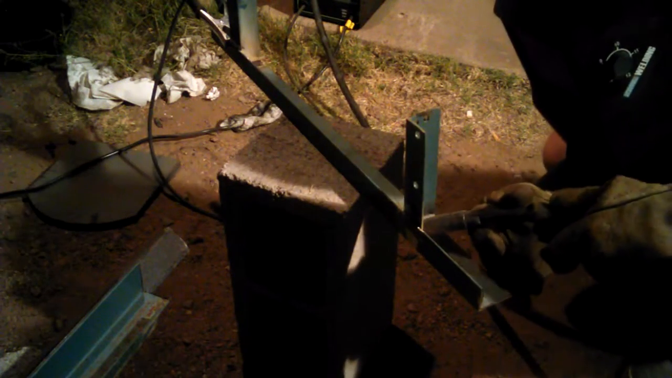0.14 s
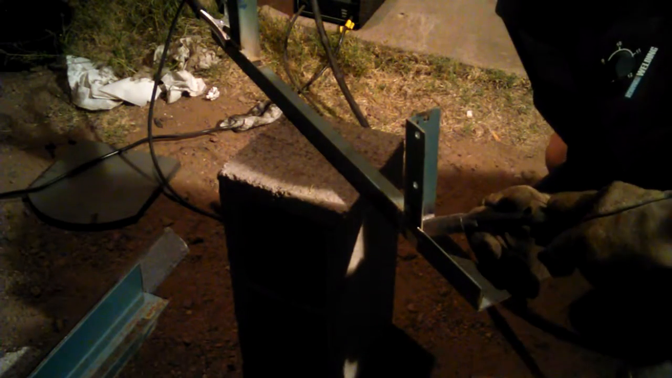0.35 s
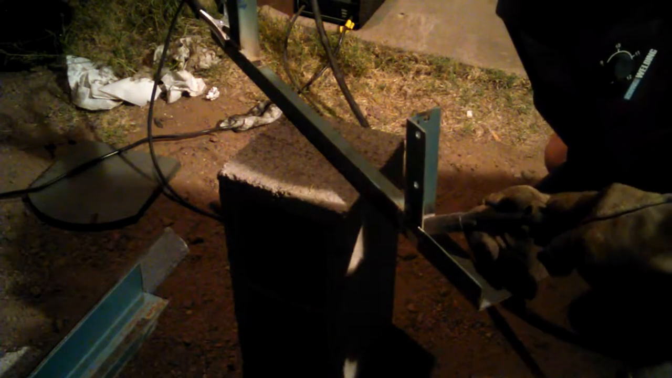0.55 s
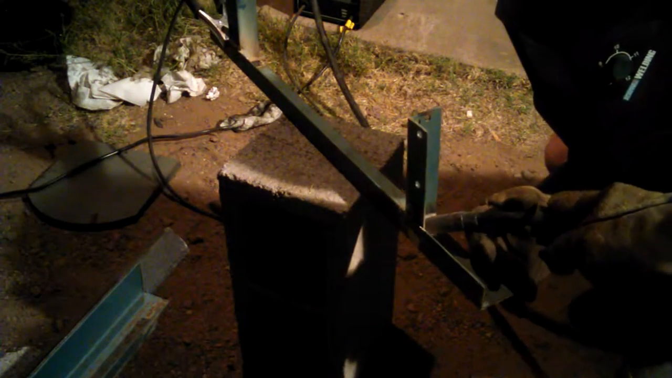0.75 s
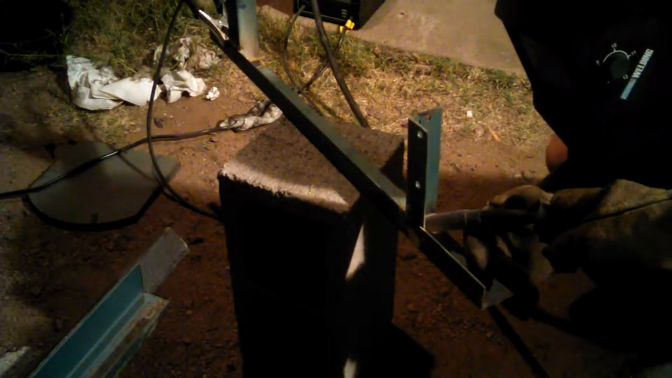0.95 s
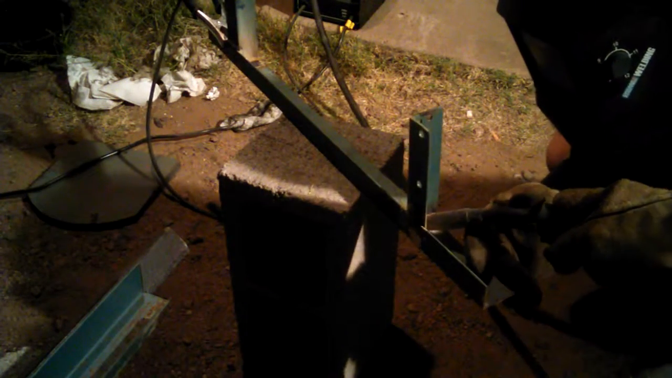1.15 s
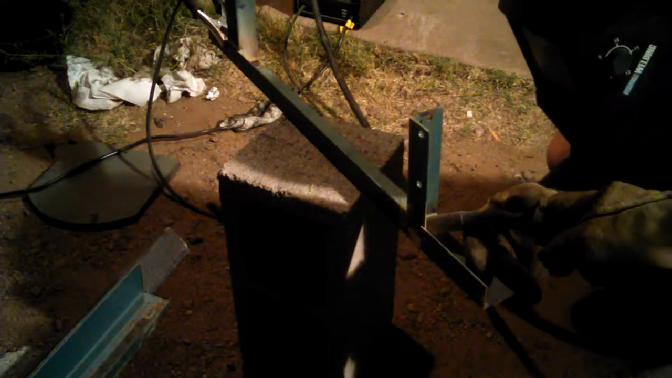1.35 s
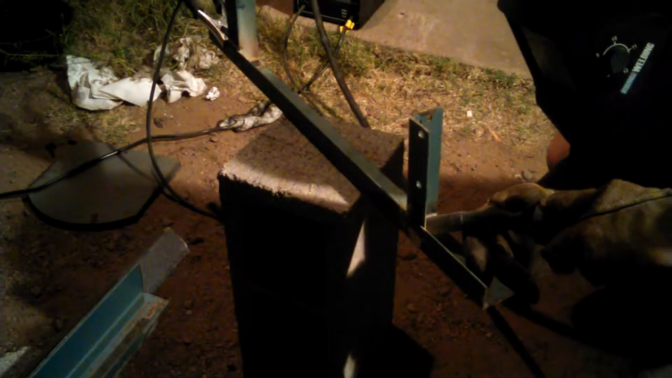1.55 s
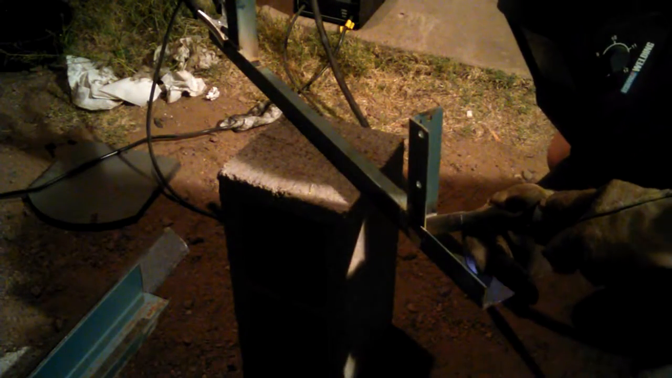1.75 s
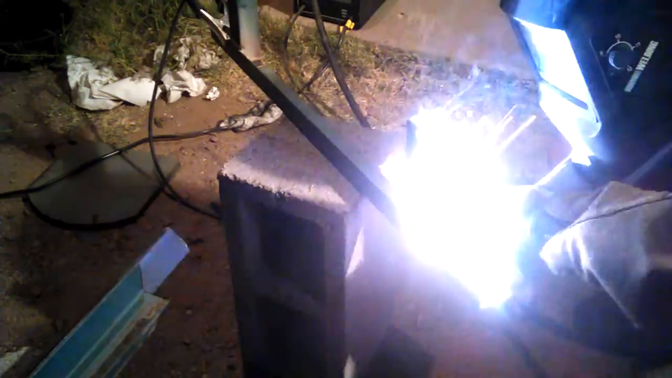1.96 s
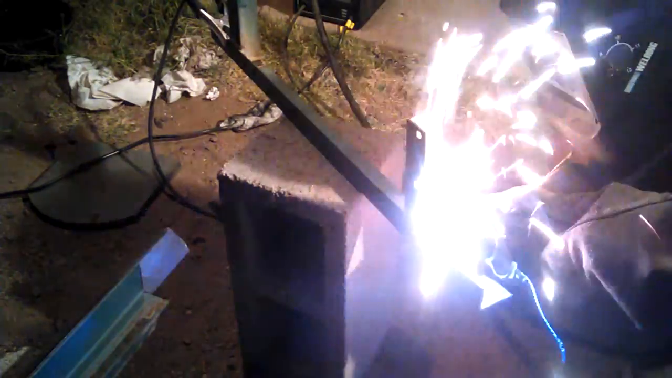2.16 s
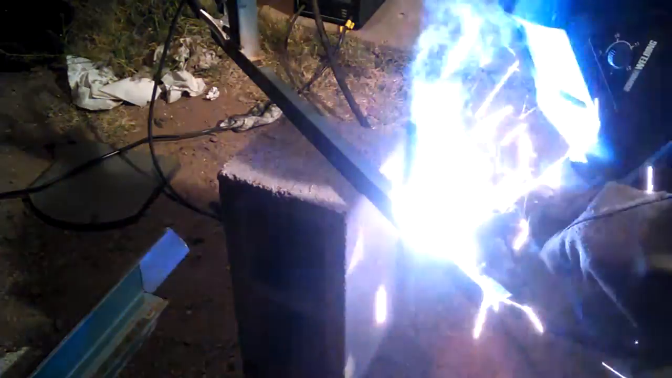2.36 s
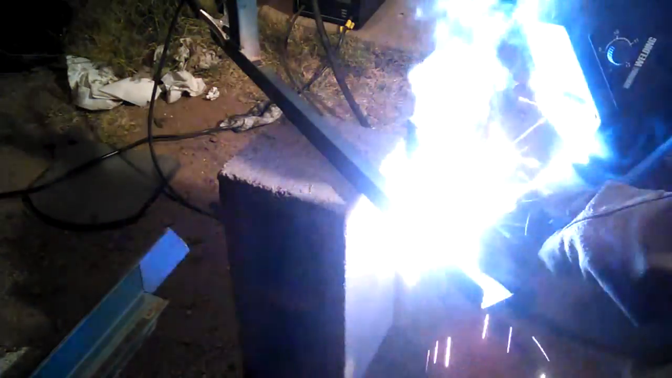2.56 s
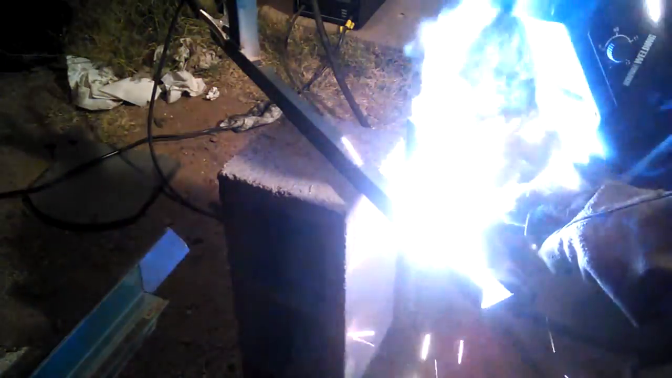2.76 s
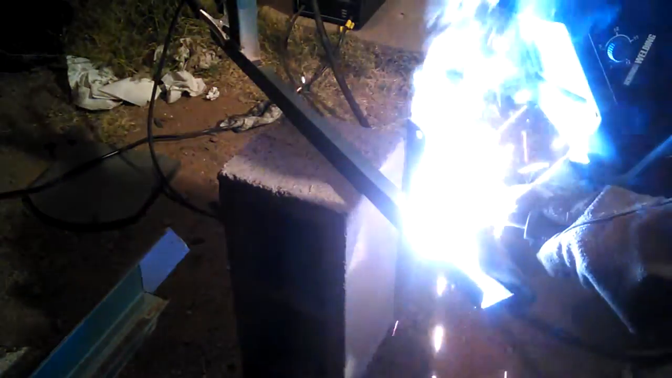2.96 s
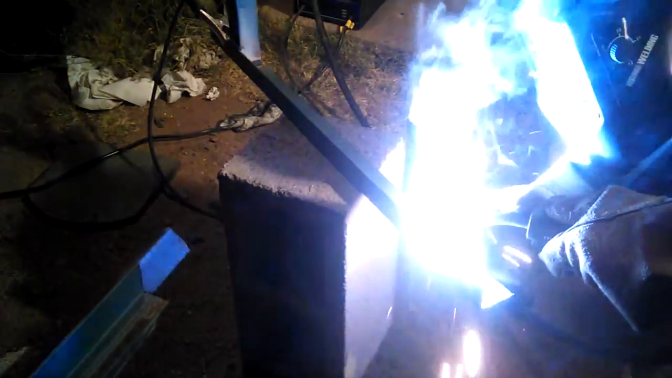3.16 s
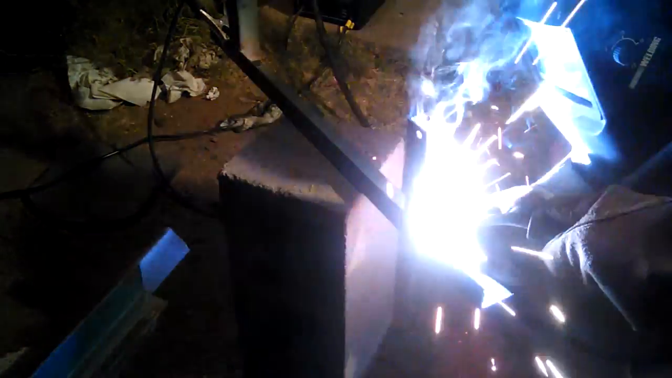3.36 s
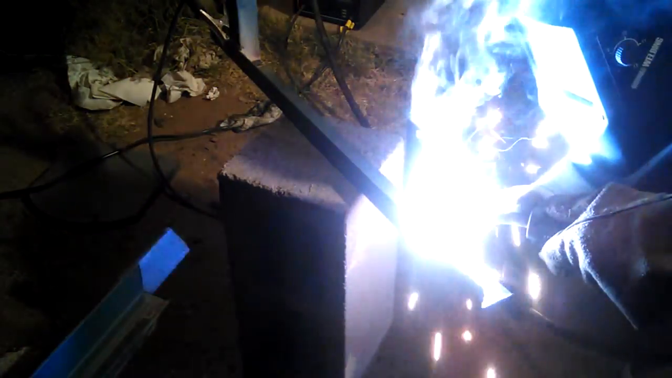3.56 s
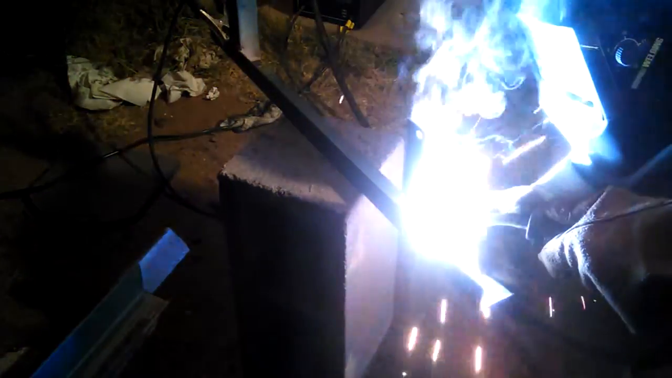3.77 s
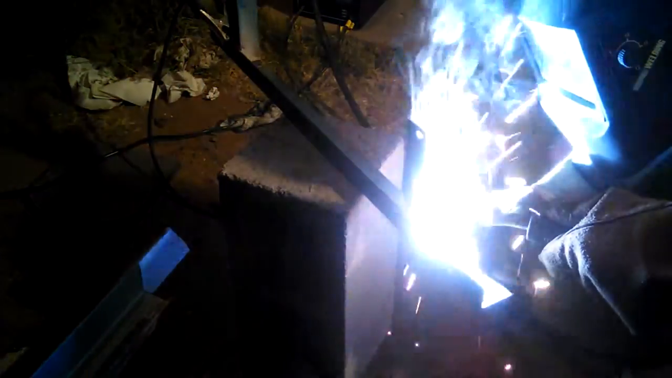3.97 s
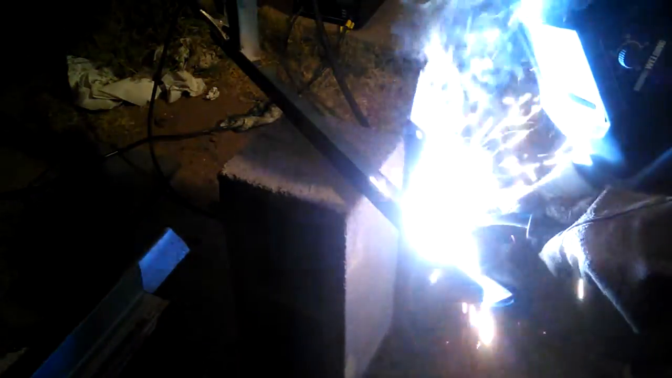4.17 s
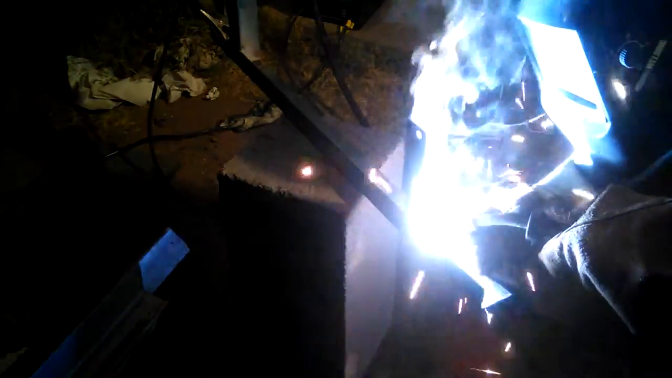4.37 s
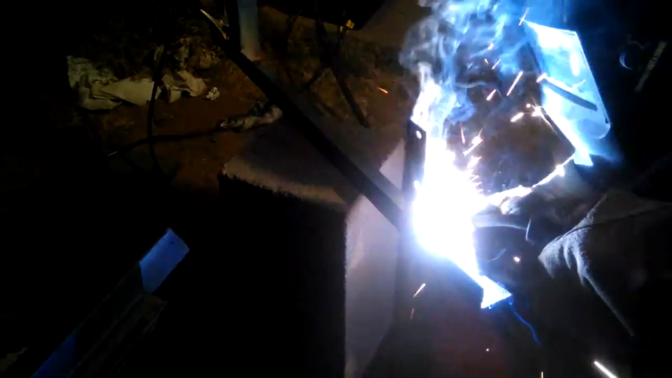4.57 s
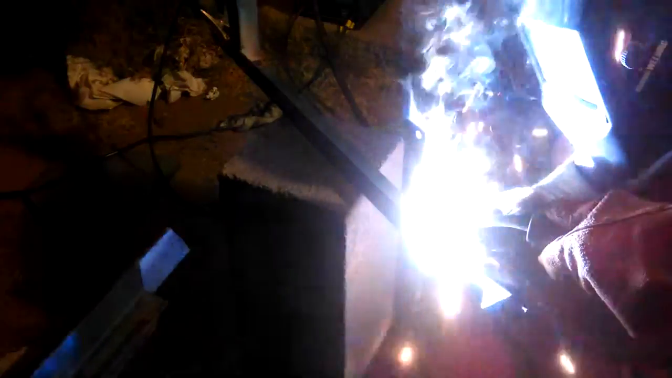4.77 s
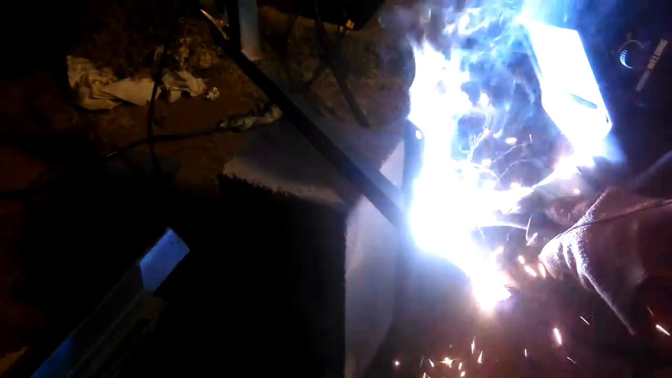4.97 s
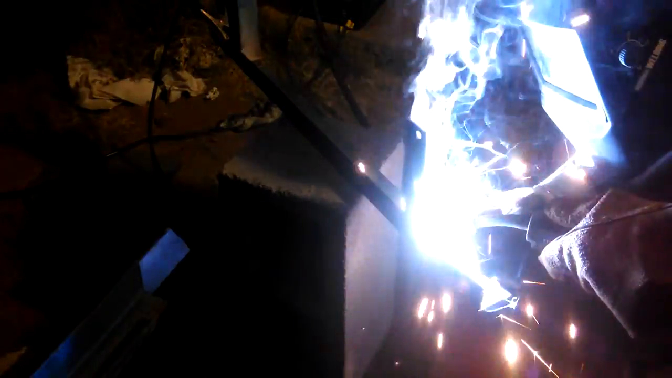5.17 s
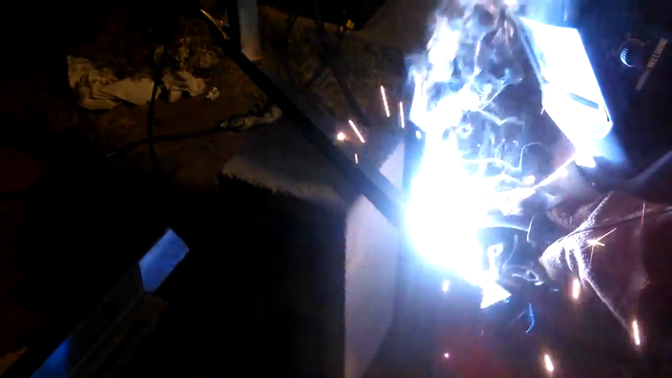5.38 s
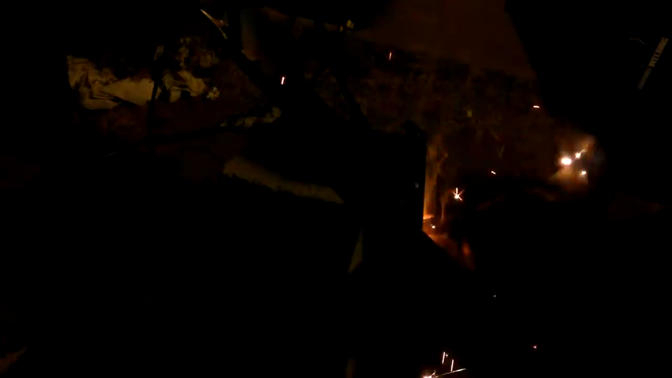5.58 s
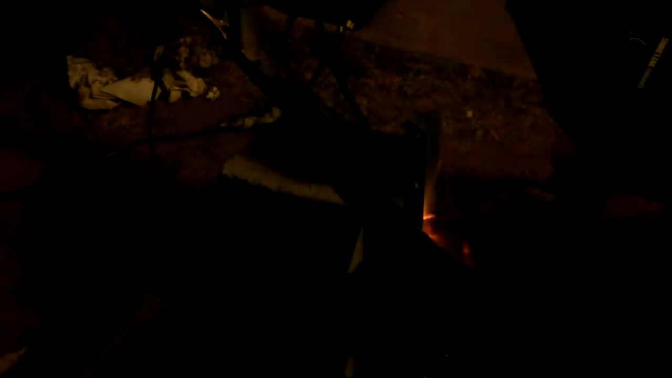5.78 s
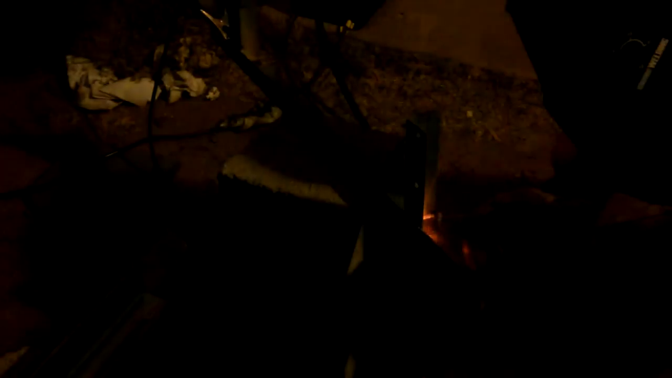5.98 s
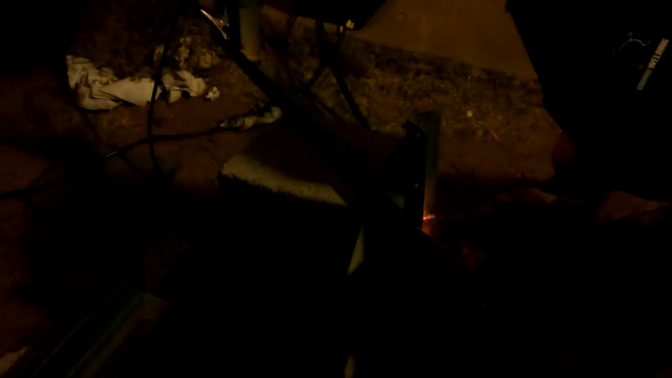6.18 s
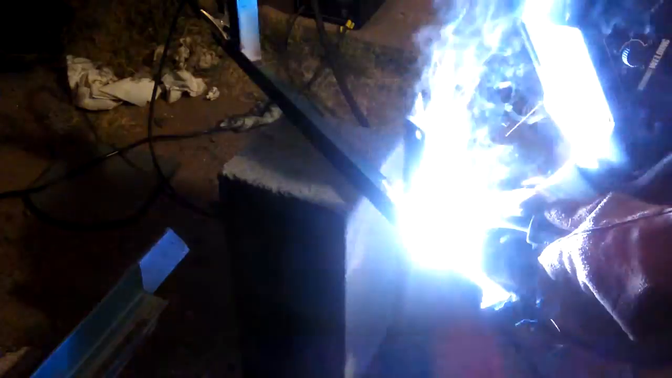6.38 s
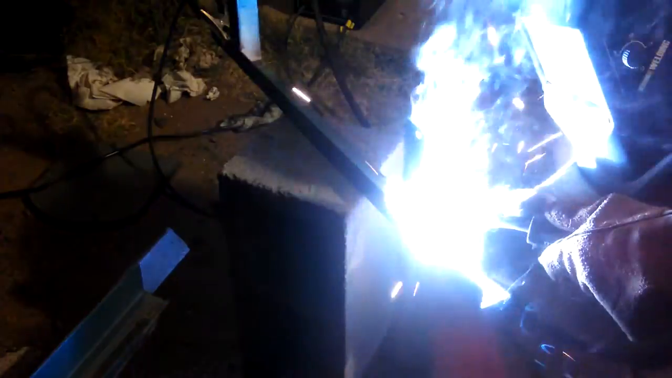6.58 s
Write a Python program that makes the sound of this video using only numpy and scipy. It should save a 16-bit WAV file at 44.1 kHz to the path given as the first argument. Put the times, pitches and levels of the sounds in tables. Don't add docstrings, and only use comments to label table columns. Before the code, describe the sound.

Outdoor wire-feed welding close up: faint hum and glove scuffs, a burst of uneven pops, dense buzzing crackle, brief pause, crackle again.

```python
import sys
import numpy as np
from scipy import signal
from scipy.fft import rfft, irfft
from scipy.io import wavfile
from scipy.ndimage import uniform_filter1d

SR = 44100
rng = np.random.default_rng(int(sys.argv[2]) if len(sys.argv) > 2 else 0)


def boost(x):
    u = np.asarray(x, float) / 20
    return 10 ** u


def file_out(sig):
    cols = np.atleast_2d(sig).T
    lim = np.clip(cols, -1, 1)
    pcm = np.round(lim * 32767).astype(np.int16)
    wavfile.write(sys.argv[1], SR, pcm)


N = 291942
T = np.arange(N) / SR
RIPPLE_HZ, RIPPLE_RAD = 120.045, 1.6
STRIKES_S = (2.0, 6.25)
LEAD = 64


def level(x, db):
    return x * boost(db) / np.sqrt(np.mean(x ** 2))


def along(points, hz):
    f, v = np.transpose(points)
    return np.interp(np.log(hz + 1), np.log(f), v)


def band(x, lo_hz, hi_hz):
    sos = signal.butter(2, [lo_hz, hi_hz], "band", fs=SR, output="sos")
    return signal.sosfilt(sos, x)


def walk(rate):
    hold = int(SR / rate)
    x = np.repeat(rng.standard_normal(N // 40)[:N // hold + 1], hold)
    return uniform_filter1d(uniform_filter1d(x, hold), hold)[:N]


def hard_pops():
    # start_s, peak_db, crispness_db
    striking = [(1.903, -10.5, -27), (1.9225, -5.5, -5), (1.9736, -14, -17), (1.9822, -11, -14),
                (1.9877, -3, -28), (2.0703, -7.5, -24), (2.084, -19, -17), (2.1003, -29, -20),
                (2.1365, 0.5, -4), (2.149, -3.5, -10), (2.1547, -8, -16), (2.1627, -9, -12),
                (2.1722, -9.5, -15), (2.184, -2, -14), (2.2592, -14, -20), (2.2734, 0, -6),
                (2.2861, -0.5, -35), (2.2979, 1.5, -16), (2.3307, 0, -10), (2.3536, -20, -10),
                (2.3792, -7, -14), (2.3874, -7.5, -3), (2.4381, 1, -5.5), (2.4798, -1, -4.5),
                (2.5109, -3.5, -18), (2.5266, -4.5, -22), (2.5631, -5.5, -12), (2.5979, -2.5, -2),
                (2.626, 1.5, -24), (2.6329, -5, 2)]
    # start_s, peak_db, crispness_db
    early = [(2.648, -1.5, -11), (2.6719, -1, -6), (2.696, -9, -15), (2.7293, -7, -5), (2.761, -3, -18),
             (2.7716, -0.5, -14), (2.7965, 0, -12), (2.848, -7, -18), (2.864, -2.5, -5), (2.87, -9, -2.5),
             (3.087, -8, 3.5), (3.121, -16, 7), (3.236, -6.5, -5), (3.2866, -4.5, -7), (3.3774, -5.5, 0),
             (3.4465, -7, -22), (3.454, -3, -14), (3.4729, -3, -5), (3.481, -2.5, -11), (3.5045, -2.5, -9),
             (3.5533, -1, -7), (3.595, -3.5, -15), (3.632, -6, -12), (3.6875, -5.5, -2),
             (3.7127, -5.5, -18), (3.7777, -10, -9), (3.7974, -2.5, -2), (3.902, -2, -15),
             (3.9459, -6, -13), (4.0962, -5, -2.5)]
    # start_s, peak_db, crispness_db
    late = [(4.1209, -3, 2), (4.1532, -5, 1), (4.1621, -4, -20), (4.188, -2.5, -18), (4.2144, -4, -10),
            (4.2469, -3, -9), (4.2611, 0, -12), (4.3033, -1, -12), (4.3465, -6, -0.5), (4.3697, -5, -9),
            (4.4053, -3, -1), (4.4297, -6, 0), (4.4871, -4.5, -5), (4.5194, -8, -3), (4.562, -0.5, -10),
            (4.6107, -3.5, -7), (4.6961, -4.5, 1), (4.7448, -2, -19), (4.829, -2.5, -9), (4.8446, -5.5, -1),
            (4.8614, -7, -1), (4.9287, -4.5, -15), (5.086, -6.5, -5), (5.163, -20, 3), (5.2143, -2, -8),
            (5.2449, -3.5, -19), (5.3043, 2, -29), (5.3281, -5, 4), (5.419, -0.5, -5), (5.43, -5, -18)]
    # start_s, peak_db, crispness_db
    ending = [(5.4463, -6.5, -20), (5.4635, -8.5, -7), (5.4786, -2, -3), (5.513, -1.5, -7),
              (5.527, -9.5, -8), (5.5545, -11, -23), (5.5626, -18, -19), (5.5789, -9, -20),
              (5.6175, -19, -27), (5.6925, -29, 1.5), (6.3294, -15, -20), (6.3427, -2.5, -7),
              (6.3716, -1, -21), (6.3772, -2.5, -22), (6.3882, -13, 6), (6.3935, -4, -20),
              (6.4123, -3.5, -15), (6.445, -5.5, -6), (6.4612, -7, -11), (6.511, -4.5, -9),
              (6.5184, -3.5, -16), (6.5447, -4.5, -11), (6.5691, -3.5, -3), (6.5764, -1.5, -16)]
    return np.transpose(striking + early + late + ending)


def lesser_pops(sizzle_db):
    # start_s, end_s
    steady = [(2.49, 5.42), (6.4, 6.62)]
    share, early, spread = .45, .05, .12
    over_db, scatter_db, crisp_db, crisp_scatter_db = 23, 3.5, -10, 4.5
    crest = np.arange(int(RIPPLE_HZ * N / SR))
    pick = rng.random(len(crest))
    shift, size, crisp = rng.standard_normal((len(crest), 3)).T
    s = (crest - RIPPLE_RAD / (2 * np.pi) - early + spread * shift) / RIPPLE_HZ
    free = np.abs(s[:, None] - hard_pops()[0]).min(axis=1) > .5 / RIPPLE_HZ
    in_steady = np.any([(s > a) & (s < b) for a, b in steady], axis=0)
    peak_db = np.interp(s, T, sizzle_db) + over_db + scatter_db * size
    found = np.array([s, peak_db, crisp_db + crisp_scatter_db * crisp])
    return found[:, (pick < share) & free & in_steady]


def pops(shorts):
    s, peak_db, top_db = shorts
    chance = rng.random((len(s), 10))
    click, crisp = np.zeros((2, N + SR))
    at = (s * SR).astype(int)
    late = ((chance[:, :5] ** 2 * .003 - .0004) * SR).astype(int)
    side = boost(-8) * (2 * chance[:, 5:] - 1)
    for delay, size in zip([0, *late.T], [-1, *side.T]):
        np.add.at(click, at + delay, size * boost(peak_db + 2.0))
        np.add.at(crisp, at + delay, size * boost(peak_db - 3) * (boost(top_db + 11) - 1))
    return click[:N] + band(crisp[:N], 5500, 19000)


def power():
    # start_s, sizzle_db
    touch = [
        (1.86, -85),
        (1.895, -49.5),
        (1.905, -33.5),
        (1.935, -46),
        (1.96, -49.5),
        (1.975, -32),
        (2.0, -42.5),
        (2.064, -50.5),
        (2.073, -32.5),
    ]
    # start_s, sizzle_db
    bead = [(2.13, -36), (2.43, -40.5), (2.5, -37), (2.95, -33), (3.05, -37), (3.3, -32.5), (3.52, -33),
            (3.58, -40), (3.7, -29.5), (4.03, -33.5), (4.12, -32), (4.6, -32.5), (5.25, -32), (5.39, -35),
            (5.47, -30.5), (5.53, -36), (5.59, -44.5), (5.67, -67)]
    # start_s, sizzle_db
    restrike = [
        (6.24, -76),
        (6.265, -54.5),
        (6.315, -42),
        (6.338, -38),
        (6.35, -34.5),
        (6.4, -34),
        (6.5, -35),
        (6.62, -32),
    ]
    choke_db, choke_s, choke_from_db = -5, 0.021, -11.5
    flare_db, flare_s = 6.5, 0.02
    bright_db, cold_db, warm_up_s, waver_db = 1, -6, 0.23, 1.5
    sizzle_db = np.interp(T, *np.transpose(touch + bead + restrike))
    choke, flare = np.zeros((2, N))
    span = SR // 16
    for s, db, _ in hard_pops().T:
        hard = np.clip(1 - db / choke_from_db, 0, 1)
        at = int(s * SR)
        before, after = slice(at - span, at), slice(at, at + span)
        choke[before] = np.maximum(choke[before], hard * np.exp((T[before] - s) / choke_s))
        flare[after] = np.maximum(flare[after], hard * np.exp((s - T[after]) / flare_s))
    swing_db = choke_db * choke * (1 - flare) + flare_db * flare
    cold = sum(np.exp(-np.abs(T - s) / warm_up_s) * (T > s) for s in STRIKES_S)
    return sizzle_db, swing_db, bright_db + cold_db * cold + waver_db * walk(12)


def sizzle(sizzle_db, bright_db):
    turn = 2 * np.pi * RIPPLE_HZ * T + RIPPLE_RAD
    ripple_db = 4.6 * np.cos(turn) + 1.2 * np.cos(turn / 2 - 1.1)
    pump_db = ripple_db + 2.28 * walk(130) + 1.5 * walk(35)
    struck = rng.random(N) < 2500 / SR
    sparks = struck * boost(1.88 * rng.exponential(size=N)) * np.sign(rng.standard_normal(N))
    hiss = level(rng.standard_normal(N), -1.9)
    spitting = np.clip((sizzle_db + 50) / 8, 0, 1)
    x = level(boost(pump_db) * (spitting * level(sparks, 0) + hiss), 0)
    top = band(x, 5500, 19000)
    return boost(sizzle_db - 0.83) * (x + (boost(bright_db) - 1) * top)


def puffs():
    # start_s, peak_db
    bursts = [(2.0703, -11), (2.1611, -11.5), (2.1841, -23), (2.2979, -13.5), (2.648, -20), (3.4466, -19),
              (3.4887, -15), (3.5031, -27), (3.5216, -16.5), (3.9028, -10), (3.9963, -18), (4.0964, -13),
              (4.2691, -15), (4.5196, -20), (4.7039, -34), (5.2145, -24), (5.3053, -34), (5.4458, -32),
              (6.3716, -14.5), (6.3935, -25), (6.4612, -20), (6.5447, -21)]
    s, peak_db = np.transpose(bursts)
    push = np.zeros(N)
    push[(s * SR).astype(int)] = -boost(peak_db + 19)
    return band(push, 186, 1060)


def causal(points, size=4096):
    cep = irfft(along(points, np.arange(size // 2 + 1) * SR / size) * np.log(10) / 20)
    cep[1:size // 2] *= 2
    cep[size // 2 + 1:] = 0
    return np.exp(rfft(cep))


def paths(shift_ms, size=4096):
    # freq_hz, level_db
    left = [(550, -12), (900, -15), (1300, -3.5), (1600, -1), (1850, 4), (2150, 5), (2780, -10), (3200, 0),
            (4250, 4), (5200, -7), (6100, -11), (7100, -7), (8000, -20), (10800, -6), (13500, -21),
            (15300, -14)]
    # freq_hz, level_db
    right = [(800, -16), (1300, -8), (1850, -1), (2250, -1), (2550, -13), (3400, -9), (4800, -8),
             (6300, -13), (7900, -23), (9000, -16), (11500, -16), (12800, -25), (15300, -22), (15800, -24)]
    # delay_ms, left_db, right_db
    echoes = [(1.3, -21, -22), (1.72, -17, -20), (2.24, -19, -8), (2.75, -18, -18), (3.3, -20, -17),
              (6.2, -19, -19)]
    # freq_hz, lag_rad
    right_lag = [(400, 0.102), (2000, 0.79), (4400, 2.24), (7000, 0.84), (12000, 3.1)]
    yard_t60_s, yard_db = .06, (-11, -7)
    ground_ms, ground_db, ground_hz, ground_width_hz = 2.66, -4, 1000, 480
    hz = np.arange(size // 2 + 1) * SR / size
    t = np.arange(size) / SR
    late_ms = np.array(echoes)[:, 0] + shift_ms * rng.standard_normal(len(echoes))
    soil = boost(ground_db) * np.exp(-((hz - ground_hz) / ground_width_hz) ** 2)
    soil = soil * np.exp(-2j * np.pi * hz * ground_ms / 1000)
    out = []
    for k, colour in enumerate((left, right)):
        near = 1 - soil
        for echo, ms in zip(echoes, late_ms):
            near = near + boost(echo[1 + k]) * np.exp(-2j * np.pi * hz * ms / 1000)
        scatter = rng.standard_normal(size) * boost(-60 * t / yard_t60_s) * (t > .001)
        scatter *= boost(yard_db[k]) / np.linalg.norm(scatter)
        jitter_rad = np.pi * hz * shift_ms * rng.standard_normal() / 1000
        lag = np.exp(-1j * k * (along(right_lag, hz) + jitter_rad))
        out.append(irfft(causal(colour) * (near + rfft(scatter)) * lag))
    return np.roll(out, LEAD, axis=1) / np.abs(irfft(causal(left))).max()


def wander(arc, count=4):
    share = boost(25 * np.array([walk(60) for _ in range(count)]))
    share = share / share.sum(axis=0)
    spots = [signal.oaconvolve((arc * w)[None], paths(.035), axes=1) for w in share]
    return sum(spots)[:, LEAD:LEAD + N]


def scuffs():
    # start_s, peak_db, length_s
    rubs = [
        (0.967, -56.5, 0.016),
        (0.983, -60, .02),
        (1.158, -58, 0.025),
        (1.189, -58, 0.024),
        (1.866, -48.5, 0.0072),
        (6.253, -51.5, 0.0089),
    ]
    # freq_hz, width_hz, level_db
    modes = [(2650, 450, -8), (3150, 300, -14), (4500, 600, -11), (5600, 600, -14)]
    shape = sum(boost(db) * np.exp(-np.clip(T - s, 0, 1) / length) * (T > s) for s, db, length in rubs)
    ticks = rng.standard_normal((2, N)) * (rng.random(N) < 4000 / SR)
    rasp = level(band(ticks, 1800, 8000), -2)
    for f, w, db in modes:
        rasp = rasp + level(band(ticks, f - w / 2, f + w / 2), db)
    return uniform_filter1d(shape, size=90) * rasp


def welder(burning):
    # freq_hz, width_hz, level_db
    blades = [(98.5, 59, -61), (267.1, 5.2, -57), (319, 13, -69.5), (618, 20, -71.5)]
    # multiple of the ripple, level_db
    load_hum = [(1, -54.5), (2, -66), (3, -61.5), (4, -61.5)]
    fan = sum(level(band(rng.standard_normal(N), hz - w / 2, hz + w / 2), db) for hz, w, db in blades)
    buzz = np.zeros(N)
    for k, db in load_hum:
        buzz += boost(db + 4 + 0.28 * walk(14)) * np.sin(2 * np.pi * k * RIPPLE_HZ * T + k)
    return (fan + buzz * uniform_filter1d(burning, size=2000)) * boost(np.array([[.7], [-.7]]))


def night():
    # freq_hz, level_db per Hz
    spectrum = [(12, -54), (20, -11.5), (27, -16.5), (91, -2), (210, -11), (270, -10), (337, -14),
                (459, -18), (624, -21), (802, -22.5), (873, -24), (10800, -47), (16000, -50)]
    # freq_hz, correlation from -1 to 1
    likeness = [(60, 0.93), (130, 0.96), (290, 0.77), (640, 0.52), (1410, -0.18), (3100, -0.18),
                (6820, -0.28), (15000, 0.76)]
    hz = np.arange(N // 2 + 1) * SR / N
    mid, side = rfft(rng.standard_normal((2, N))) * boost(along(spectrum, hz))
    alike = np.clip(along(likeness, hz), -.99, .99)
    mid = irfft(mid * np.sqrt(1 + alike), N)
    side = irfft(side * np.sqrt(1 - alike), N)
    pair = np.array([mid + side, mid - side]) * boost(np.array([[.6], [-.6]]) + 1.0 * walk(3))
    return level(pair, -47)


def scene():
    strike_end_s, strike_db = 2.44, -5.5
    sizzle_db, swing_db, bright_db = power()
    shorts = np.hstack([hard_pops(), lesser_pops(sizzle_db)])
    arc = pops(shorts) + puffs() + sizzle(sizzle_db + swing_db, bright_db)
    bare = np.clip((strike_end_s - T) / 0.14 + (T > STRIKES_S[1]), 0, 1)
    arc = arc + boost(strike_db) * bare * band(arc, 2300, 3630)
    small = band(arc, 280, 20000)
    burning = 1. * (sizzle_db > -55)
    return wander(small) + scuffs() + welder(burning) + night()


def roll_off(x):
    return signal.sosfilt(signal.butter(12, 16980, fs=SR, output="sos"), x)


def record(dry):
    soft = .92 * np.tanh(dry / .92)
    low_pass = signal.ellip(8, .2, 60, 15620, fs=SR, output="sos")
    return roll_off(signal.sosfilt(low_pass, soft) + .0012)


dry = scene()
out = record(dry)
file_out(out)
```